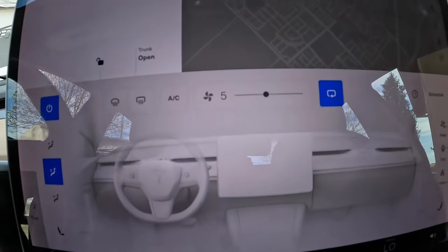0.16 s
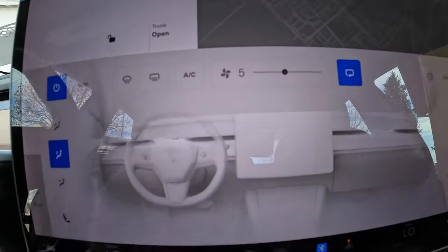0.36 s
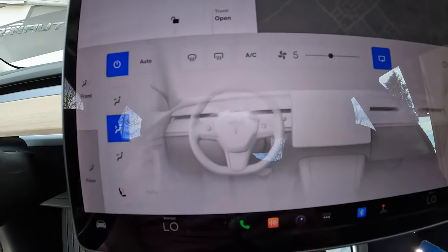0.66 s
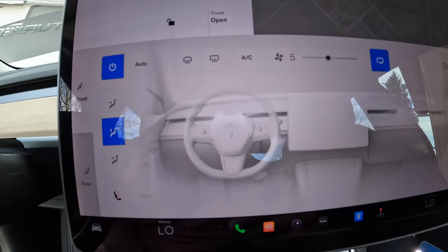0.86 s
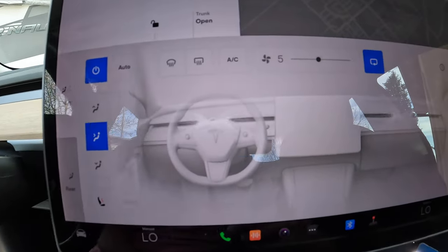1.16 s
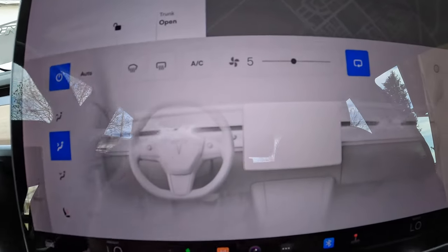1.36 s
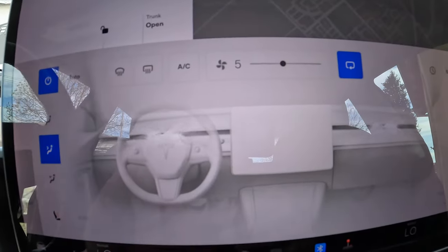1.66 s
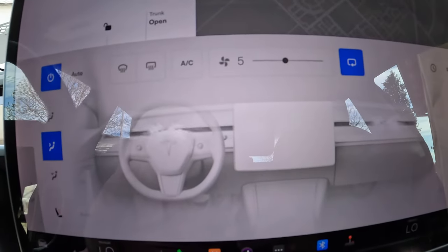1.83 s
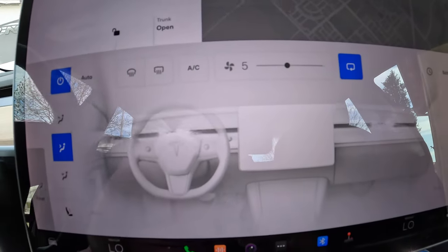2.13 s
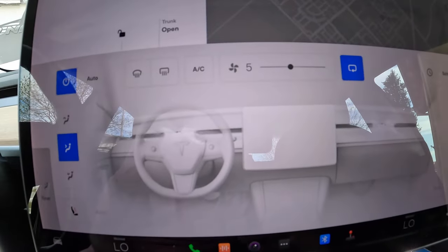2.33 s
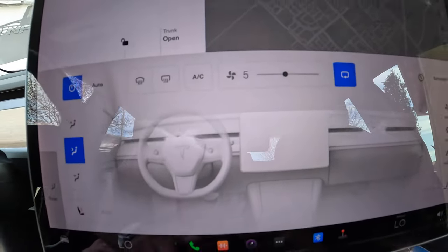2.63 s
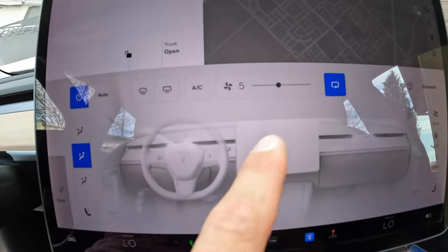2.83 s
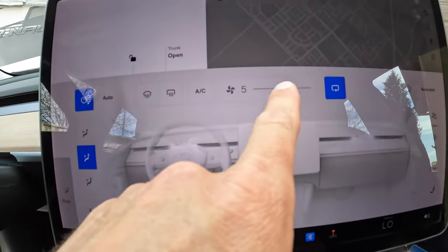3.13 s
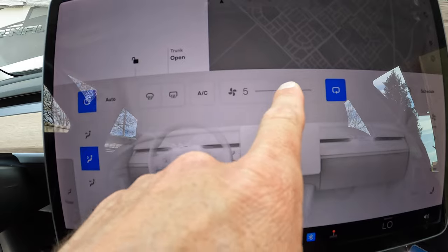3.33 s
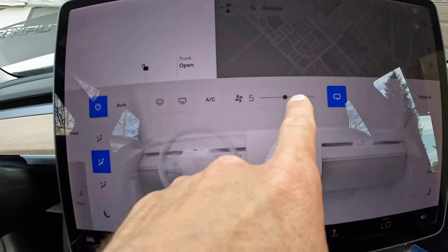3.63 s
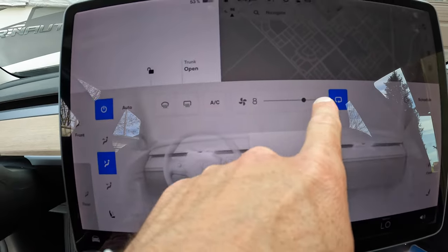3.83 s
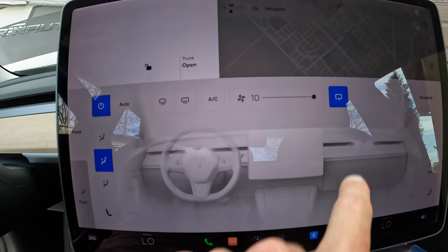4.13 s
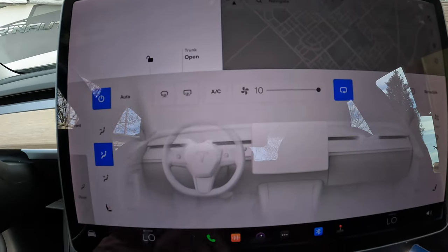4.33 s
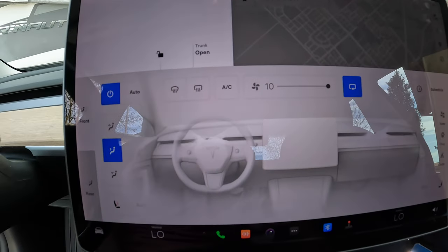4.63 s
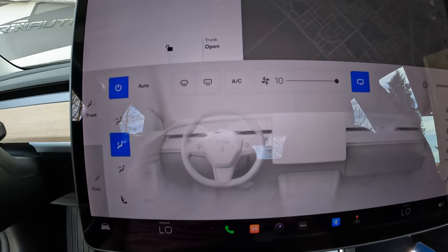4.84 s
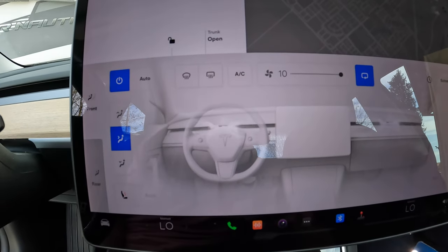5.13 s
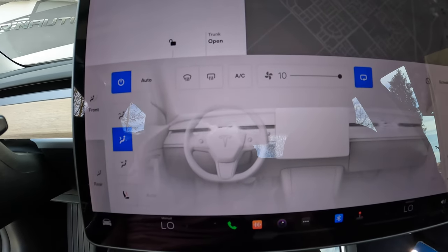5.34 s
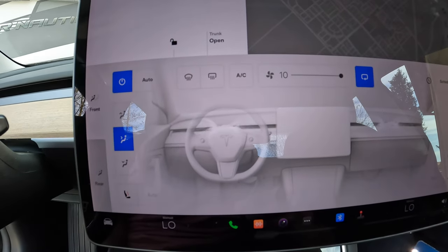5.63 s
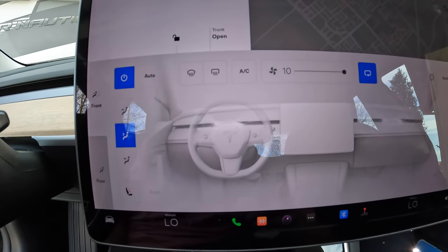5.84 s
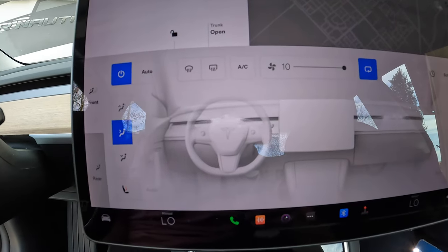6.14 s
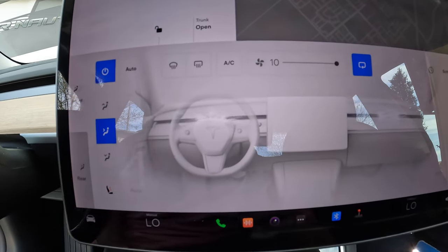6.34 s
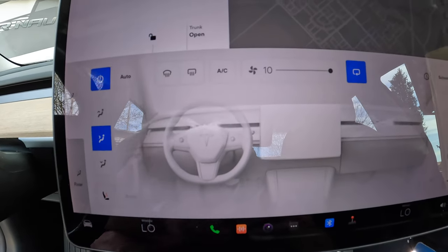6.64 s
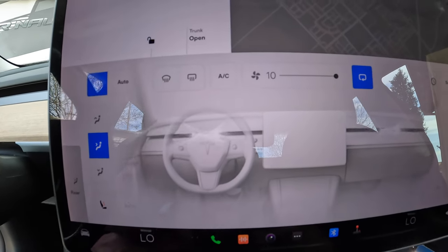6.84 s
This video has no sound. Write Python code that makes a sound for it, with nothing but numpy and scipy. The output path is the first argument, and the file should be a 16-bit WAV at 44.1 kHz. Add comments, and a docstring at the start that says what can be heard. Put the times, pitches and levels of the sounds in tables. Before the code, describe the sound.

Inside a parked car, a cabin fan blows steadily as a vehicle rolls past outside, then whines upward and rushes much louder.

```python
"""Inside a parked car with closed windows, the cabin blower holds half speed, then spins up and keeps climbing.
Shaped noise rumbles in the ducts and hisses through ringing vents; a sine and its octave whine with the blades.
Pressure throbs behind a shut air flap, which creeps ajar, swings open with a soft knock and lets the flow jump.
Outside, a vehicle of gliding hum and banded tyre noise rolls past and slows over distant traffic.
Faint, raspy, gliding tones squeak now and then."""
import sys
import numpy as np
from scipy import signal
from scipy.fft import rfft, irfft
from scipy.io import wavfile
from scipy.ndimage import uniform_filter1d

SR = 44100
rng = np.random.default_rng(int(sys.argv[2]) if len(sys.argv) > 2 else 0)


def output_pcm(signal):
    """Save a mono or channel-first signal as 16-bit PCM at the path in sys.argv[1].

    Samples are clipped to [-1, 1] before scaling.
    """
    pcm = np.clip(np.atleast_2d(signal).T, -1, 1) * 32767
    wavfile.write(sys.argv[1], SR, np.round(pcm).astype(np.int16))


N = 308342
T = np.arange(N) / SR  # time [s]
F = np.arange(N // 2 + 1) * SR / N  # frequency of each spectral bin [Hz]


def undb(db):
    """Decibels to gain."""
    return 10 ** (np.asarray(db) / 20)


def since(start_s):
    """Seconds gone by since a moment; zero before it."""
    return np.maximum(T - start_s, 0)


def colour(points, beyond=-np.inf):
    """Join points on a log-frequency axis; a dB spectrum falls silent above its last point."""
    hz, values = np.transpose(points)
    return np.interp(np.log(F + 1), np.log(hz), values, right=beyond)


def walk(rate):
    """Smooth chance that moves about rate times a second; spread 1."""
    spectrum = rfft(rng.standard_normal(N))
    smooth = irfft(spectrum * np.exp(-(F / rate) ** 2) * (F > 0), N)
    return smooth / smooth.std()


def sine(hz):
    """A tone of RMS 1 that follows a pitch curve."""
    return np.sqrt(2) * np.sin(2 * np.pi * np.cumsum(hz) / SR)


def treble_of(x, split_hz):
    """The part of a sound above a soft split."""
    return irfft(rfft(x) / (1 + (split_hz / (F + 1)) ** 4), N)


def swell(x, db, treble_growth, split_hz):
    """Follow a level curve; the treble rises and falls by a different factor."""
    treble = treble_of(x, split_hz)
    return (x - treble) * undb(db) + treble * undb(treble_growth * db)


# how diffuse the cabin sound is: (frequency [Hz], side level relative to mid [dB])
DIFFUSENESS = [(25, -22.5), (60, -28.5), (110, -35), (200, -20), (370, -15), (670, -17), (1220, -11.5),
               (2600, -9.5), (4060, -11.5), (7410, -5.5), (13500, -7)]


def turbulence(db):
    """Stereo noise of the given dB per Hz: bass nearly alike on both sides, treble diffuse."""
    mid, side = rfft(rng.standard_normal((2, N)))
    width = undb(colour(DIFFUSENESS, beyond=None))
    left_right = mid + width * side * np.array([[1], [-1]])
    left_right = left_right / np.sqrt(1 + width ** 2)  # keeps the power
    return irfft(left_right * undb(db), N) * np.sqrt(SR / 2)


def noise_band(hz, width_hz, db):
    """Turbulence in one rounded band; dB per Hz at its centre."""
    return turbulence(db - 20 * np.log10(1 + (2 * (F - hz) / width_hz) ** 2))


def cabin(x, echo_db=-27, decay_s=0.012, count=24):
    """Short reflections off glass and trim put a fine ripple into the spectrum."""
    delay_s = rng.uniform(.002, .03, count)
    fade = np.exp(-(delay_s - delay_s.min()) / decay_s / 2)
    taps = np.zeros(N)
    taps[(delay_s * SR).astype(int)] = rng.choice([-1, 1], count) * undb(echo_db) * fade
    taps[0] = 1  # direct sound
    return irfft(rfft(x) * rfft(taps) / np.linalg.norm(taps), N)


# distant traffic heard through the car body: (frequency [Hz], level [dB per Hz])
TRAFFIC_SPECTRUM = [(18, -56.5), (27, -55.5), (36, -64), (55, -53.5), (78, -51.5), (105, -59), (150, -60),
                    (190, -69), (315, -73.5), (370, -88), (420, -84.5), (490, -86.5), (630, -77.5),
                    (730, -84), (950, -84), (1600, -87), (3200, -112)]


def traffic():
    """Distant traffic: steady noise, dulled by the car body."""
    return turbulence(colour(TRAFFIC_SPECTRUM))


def far_roar(hz=450, width_hz=200, db=-80, leaves_s=2.15, fade_db_per_s=16):
    """Dull road noise from farther down the street holds, then dies away."""
    return noise_band(hz, width_hz, db) * undb(-fade_db_per_s * since(leaves_s))


def drone(middle_s=1.7, length_s=2.6, hz=187, rise_hz_per_s=5, db=-48, wobble=0.0087, waver_db=2):
    """A faint drone from the street creeps up in pitch, swelling and fading in one arch."""
    arch = np.cos(np.pi * np.clip((T - middle_s) / length_s, -.5, .5))
    pitch = (hz + rise_hz_per_s * (T - middle_s)) * (1 + wobble * walk(6.9))
    return sine(pitch) * arch * undb(db + waver_db * walk(6.5))


# narrow bands of road noise that swell and fade:
# (middle [s], length [s], pitch at the middle [Hz], glide [Hz per s], level at the peak [dB])
ROAD_PATCHES = [(1.5, .4, 1400, 0, -56), (1.65, 0.23, 1275, -200, -56.5), (1.968, .1, 1430, 0, -54),
                (2.269, .07, 1580, 0, -54), (2.42, 0.26, 1305, -100, -55.5), (2.58, 0.2, 998, 0, -53),
                (2.66, .38, 1168, -200, -53), (3.133, 0.21, 1382, -100, -52.5),
                (3.279, 0.28, 1100, 202, -58), (3.419, 0.16, 1240, 0, -58), (3.73, .25, 1506, 0, -55),
                (3.919, .3, 1257, 0, -57), (4.06, 0.25, 1390, -150, -53)]


def road_swells(width_hz=65):
    """Hollow, half-pitched patches of narrow-band noise rise out of the road noise and sink back."""
    out = np.zeros(N)
    grain = walk(width_hz) + 1j * walk(width_hz)
    for middle_s, length_s, hz, glide, db in ROAD_PATCHES:
        now = np.abs(T - middle_s) < length_s / 2
        t = T[now] - middle_s
        carrier = np.exp(2j * np.pi * (hz * t + glide * t ** 2 / 2))
        band = np.roll(grain, rng.integers(N))[now] * carrier
        out[now] += undb(db) * np.cos(np.pi * t / length_s) * band.real
    return out


def patchy(x, patchy_db=2.3):
    """Narrow stretches of the spectrum swell and sink by chance, a few times a second."""
    bins = signal.stft(x, nperseg=2048)[2]
    field = rng.standard_normal(bins.shape[1:])
    for _ in range(2):
        field = uniform_filter1d(field, 4, axis=0)  # across frequency bins
        field = uniform_filter1d(field, 12, axis=1)  # across time frames
    gain = undb(patchy_db * field / field.std())
    gain = gain / np.sqrt(np.mean(gain ** 2))
    return signal.istft(bins * gain)[1][:, :N]


# tyres through the glass, before the roll-by levels: (frequency [Hz], level [dB per Hz])
TYRE_SPECTRUM = [(300, -99.5), (600, -92), (800, -82.5), (980, -74), (1300, -77.5), (1600, -79.5),
                 (2000, -84), (2500, -90), (3200, -99), (5000, -113), (8000, -128)]
# roll-by, added to that spectrum: (time [s], low level [dB], body level [dB], treble level [dB])
TYRE_ROLL_BY = [(0, -9, -6.5, -5.5), (.8, -6, -7, -9), (1.0, -5, -3.5, -8), (1.5, -4, -2, -2.5),
                (1.85, -2, -2.5, -11), (2.15, -6, -3.5, -4), (2.65, -5, -2, 2), (3.05, 0.5, -0.5, 3),
                (3.4, 2.5, -.5, -0.5), (3.95, 5.5, -1, 0), (4.2, 4.5, 0, -4), (4.45, -2, -4.5, -7.5),
                (4.8, 4.5, -2, -4), (7, -5.5, -12.5, -22)]


def tyres(uneven_db=0.5, low_hz=880, split_hz=1900):
    """Patchy tyre noise in three bands swells and brightens as the vehicle rolls by, then sinks to a lower roar."""
    times, *levels = np.transpose(TYRE_ROLL_BY)
    roll = patchy(turbulence(colour(TYRE_SPECTRUM))) * undb(uneven_db * walk(14))
    low = irfft(rfft(roll) / (1 + (F / low_hz) ** 20), N)
    treble = treble_of(roll - low, split_hz)
    body = roll - low - treble
    return sum(band * undb(np.interp(T, times, db)) for band, db in zip((low, body, treble), levels))


# engine note while cruising, and how it sinks once the driver slows
ENGINE_HZ, SLOWS_S, SAG_HZ_PER_S, EASE_S = 79.7, 3.39, 8.7, 0.2633
# its hum swells, holds while alongside, and fades
NEAR_S, LEAVES_S, APPROACH_DB_PER_S, RECEDE_DB_PER_S = 3.36, 5.0, 7, 3


def engine(alongside_db=-32.5):
    """The vehicle's low hum swells as it nears; its note eases into a steady fall as it slows."""
    hz = ENGINE_HZ - SAG_HZ_PER_S * EASE_S * np.logaddexp(0, (T - SLOWS_S) / EASE_S)
    near_db = -APPROACH_DB_PER_S * np.maximum(NEAR_S - T, 0) - RECEDE_DB_PER_S * since(LEAVES_S)
    return sine(hz) * undb(alongside_db + near_db)


def street():
    """One passing vehicle over distant traffic."""
    return traffic() + far_roar() + drone() + road_swells() + tyres() + engine()


# faint thin squeaks: (start [s], length [s], start pitch [Hz], end pitch [Hz], level at the peak [dB])
SQUEAK_EVENTS = [(1.868, .035, 8280, 8400, -79), (1.916, .055, 8450, 8620, -73),
                 (1.953, .04, 11700, 12200, -79), (1.96, .038, 8750, 9050, -77),
                 (1.988, .044, 8520, 8450, -72), (2.022, .038, 11600, 11350, -80),
                 (2.055, .022, 10800, 10300, -81), (2.085, .02, 10500, 10750, -79),
                 (2.098, .03, 11600, 10500, -80), (4.02, .08, 11700, 11650, -83),
                 (4.02, .08, 12300, 12200, -84), (4.17, .045, 11500, 11700, -86)]


def squeaks(wobble=.007, rasp_db=3):
    """Brief, raspy, very high tones; each glides, swelling and fading in one arch, smeared by the cabin."""
    out = np.zeros(N)
    unsteady = 1 + wobble * walk(500)
    for start_s, length_s, start_hz, end_hz, db in SQUEAK_EVENTS:
        progress = np.minimum(since(start_s) / length_s, 1)
        hz = (start_hz + (end_hz - start_hz) * progress) * unsteady
        out += undb(db) * np.sin(np.pi * progress) * sine(hz)
    rasp = undb(rasp_db * walk(300))
    rasp = rasp / np.sqrt(np.mean(rasp ** 2))
    return cabin(out * rasp, echo_db=-16, decay_s=.02)


# air flap: throttles the flow, creeps ajar, then swings open
FLAP_SHUT_DB, CREEP_S, CREEP_DB_PER_S, SWING_S, SWING_TAKES_S = -12.5, 4.66, 12.5, 5.115, 0.047
SPIN_UP_S = 4.38  # the blower starts to speed up


def flap_shut():
    """1 until the flap swings, 0 once it has swung open."""
    return 1 - np.minimum(since(SWING_S) / SWING_TAKES_S, 1)


def back_pressure(build_s=0.28):
    """0 to 1: pressure builds behind the shut flap as the blower speeds up, and escapes when it opens."""
    return np.minimum(since(SPIN_UP_S) / build_s, 1) * flap_shut()


def seal_hiss(hz=10400, width_hz=900, db=-119, pressed_db=5):
    """Air leaks past the shut flap in a thin, high hiss that grows with the pressure."""
    return noise_band(hz, width_hz, db) * flap_shut() * undb(pressed_db * back_pressure())


def surge(hz=51, width_hz=22, db=-48):
    """Pushing against the shut flap, the air throbs deeply in the duct."""
    return noise_band(hz, width_hz, db) * back_pressure()


# what rings in the flap housing: (frequency [Hz], time to fall 60 dB [s], level [dB])
HOUSING_MODES = [(320, .05, -30), (572, .05, -23), (1300, .03, -38)]


def flap_knock(stop_s=5.173, push_s=0.0024):
    """The padded flap meets its stop: one soft push rings the plastic housing in decaying sines."""
    age = since(stop_s)
    ring = sum(undb(db - 60 * age / t60) * np.sin(2 * np.pi * hz * age) for hz, t60, db in HOUSING_MODES)
    return ring * np.minimum(age / push_s, 1)


# blade-pass pitch at half speed, then a ramp that steepens slightly
HALF_SPEED_HZ, RAMP_HZ_PER_S, RAMP_HZ_PER_S2 = 318, 96.3, 8.0
# pitch gained against the shut flap, pitch lost under load, and time from opening to the deepest sag
RACE_HZ, LOAD_SAG_HZ, SAG_AFTER_S = 3.5, 7, .2


def blade_pitch():
    """The motor holds half speed, then ramps up: racing ahead of the shut flap, sagging as it takes the load."""
    age = since(SPIN_UP_S)
    loaded = since(SWING_S) / SAG_AFTER_S
    sag = loaded * np.exp((1 - loaded ** 2) / 2)  # dips to 1, then recovers
    ramp_hz = HALF_SPEED_HZ + RAMP_HZ_PER_S * age + RAMP_HZ_PER_S2 * age ** 2 / 2
    return ramp_hz + RACE_HZ * back_pressure() - LOAD_SAG_HZ * sag


def air_flow(blade_hz, half_speed_db=-4.5, db_per_octave=7):
    """Flow in dB: it follows the blade speed, less what the flap holds back."""
    flap_db = (FLAP_SHUT_DB + CREEP_DB_PER_S * since(CREEP_S)) * flap_shut()
    return half_speed_db + db_per_octave * np.log2(blade_hz / HALF_SPEED_HZ) + flap_db


# turbulence in the ducts at 0 dB flow, before buffeting: (frequency [Hz], level [dB per Hz])
DUCT_RUMBLE = [(20, -69), (34, -69), (45, -48.5), (57, -42), (75, -38.5), (100, -37), (122, -36),
               (146, -36.5), (175, -50.5), (205, -49), (235, -55.5), (265, -56.5), (330, -77.5), (450, -98)]


def duct_air(flow_db, buffet_db=-0.35, growth=1.155):
    """Large eddies boom in the ducts and swell with the flow."""
    return turbulence(colour(DUCT_RUMBLE)) * undb(growth * flow_db + buffet_db * walk(2.1))


# hiss of the vents before resonance and flow: (frequency [Hz], level relative to VENT_DB [dB per Hz])
VENT_HISS = [(180, -24.5), (270, -2.1), (340, -8.5), (490, -20), (750, -19.5), (1500, -18.5), (2800, -21.5),
             (3500, -25.5), (5000, -28.5), (7700, -37), (8500, -42.5), (9400, -44), (10400, -44),
             (12400, -51), (14000, -61.5)]
VENT_DB = -59
# duct and dashboard resonances: (frequency [Hz], width [Hz], left lift [dB], right lift [dB])
DUCT_RESONANCES = [(421.5, 99, 7, 8.5), (591, 144, 14.5, 12.5), (639, 63, 5.5, 6.5), (829, 65, -0.5, 6.5),
                   (951, 98, -5, 4.5), (963, 164, 13, 1.7), (1305, 209, 4, 6.5), (1420, 71, 5.5, 4),
                   (1518, 113, 6, 5.5), (1644, 56, 4.3, 7), (1807, 99, 2.5, 3), (2000, 130, 5, 1),
                   (2054, 42, 2.5, 3.5), (2200, 46, 2, 0.2), (2340, 107, 4, 4.2), (2540, 105, 3.5, 6),
                   (2730, 69, 4.5, 2.5), (3280, 380, 2.5, 3), (3770, 44, 2.6, 3), (3994, 126, 2, 2),
                   (4120, 30, 4.1, 3.5), (4420, 202, 1.6, 2.5), (5198, 111, 3, 3.5), (5441, 64, 3, 3),
                   (5896, 108, 3, 1.5), (7054, 554, 1.8, -0.5)]
# the vents turn shrill: blade pitch where it begins, treble rise for each doubling of speed
SHRILL_FROM_HZ, SHRILL_DB_PER_OCTAVE = 478, 5


def vent_air(flow_db, blade_hz, flutter_db=0.56, shrill_hz=1500):
    """Small eddies at the vanes ring the ducts, a little differently on each side; fast air hisses brighter."""
    ring_db = 0
    for hz, width, left, right in DUCT_RESONANCES:
        ring_db = ring_db + np.array([[left], [right]]) / (1 + (2 * (F - hz) / width) ** 2)
    hiss = cabin(turbulence(VENT_DB + colour(VENT_HISS) + ring_db))
    shrill_db = SHRILL_DB_PER_OCTAVE * np.maximum(np.log2(blade_hz / SHRILL_FROM_HZ), 0)
    hiss = hiss + treble_of(hiss, shrill_hz) * (undb(shrill_db) - 1)
    return swell(hiss, flow_db + flutter_db * walk(29), treble_growth=0.96, split_hz=3100)


# cabin resonances that lift the blade tone at the seat, and one null between them:
# (frequency [Hz], width [Hz], lift [dB])
SEAT_RESONANCES = [(360, 32, 8), (432, 40, 13.5), (469, 34, 17), (495, 14, -10), (511, 16, 5),
                   (534, 36, 14.5), (566, 42, 18), (604, 50, 16)]
# blade tone away from any resonance: level at half speed, and its rise for each doubling of speed
WHINE_DB, WHINE_DB_PER_OCTAVE = -63.5, 9.5


def blades(hz, wobble=.0007, flutter_db=0.9, octave_db=-24):
    """The blade tone grows with speed and blooms in each cabin resonance; uneven inflow shakes it."""
    lift_db = sum(lift * np.exp(-(2 * (hz - centre) / width) ** 2) for centre, width, lift in SEAT_RESONANCES)
    db = WHINE_DB + WHINE_DB_PER_OCTAVE * np.log2(hz / HALF_SPEED_HZ) + lift_db
    shaken_hz = hz * (1 + wobble * walk(22))
    tone = sine(shaken_hz) + undb(octave_db) * sine(2 * shaken_hz)
    return tone * undb(db + flutter_db * walk(17))


def scene(whine_pan_db=0.5):
    """The blower's rumble, hiss and whine, and the flap, over the street."""
    blade_hz = blade_pitch()
    flow_db = air_flow(blade_hz)
    outside = street() + squeaks()
    flap = seal_hiss() + surge() + flap_knock()
    whine = blades(blade_hz) * undb(np.array([[whine_pan_db], [-whine_pan_db]]) / 2)
    return outside + flap + duct_air(flow_db) + vent_air(flow_db, blade_hz) + whine


# the phone's two microphone ports: (frequency [Hz], phase by which left leads [rad])
PORT_LEAD = [(150, 0), (430, 0.093), (780, -0.68), (1600, -0.53), (2800, -0.84), (3700, -0.74),
             (6200, -0.24), (9500, 0)]


def record(dry, left_db=0.22, top_hz=14100):
    """The phone's left port is slightly louder and gets the midrange a little late; the phone cuts the top."""
    lead = colour(PORT_LEAD, beyond=0)
    shift = np.exp(.5j * lead * np.array([[1], [-1]]))  # half the lead on each side
    y = irfft(rfft(dry) * shift, N) * undb([[left_db], [0]])
    return signal.sosfilt(signal.ellip(8, .2, 70, top_hz, fs=SR, output="sos"), y)


dry = scene()
out = record(dry)
output_pcm(out)
```